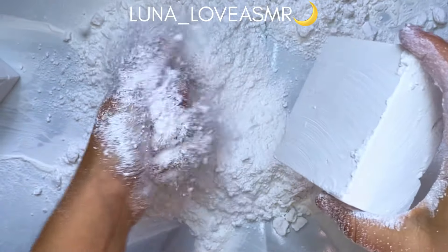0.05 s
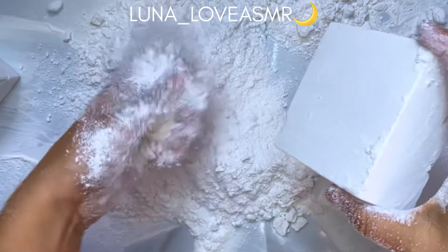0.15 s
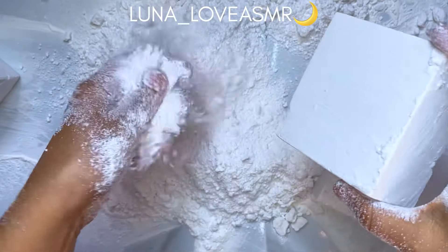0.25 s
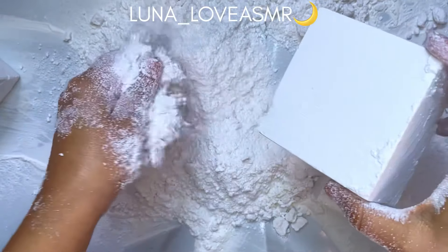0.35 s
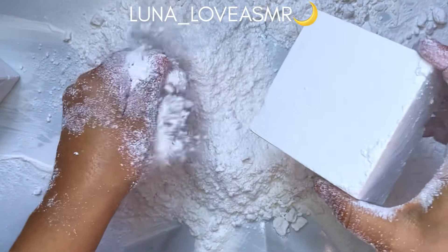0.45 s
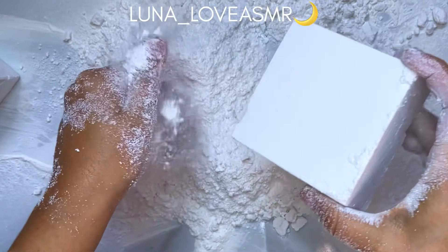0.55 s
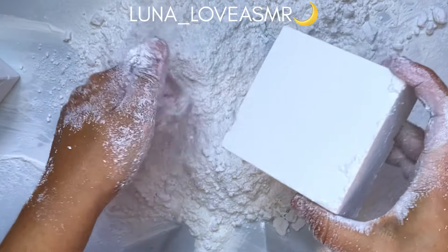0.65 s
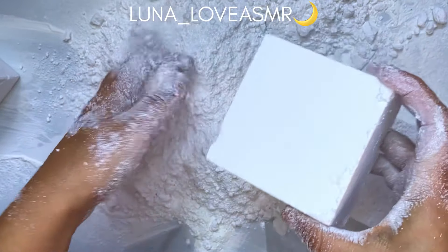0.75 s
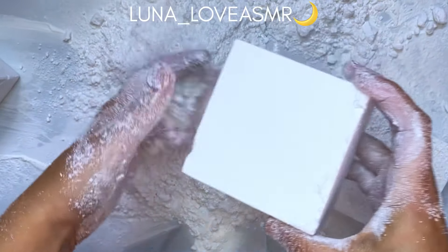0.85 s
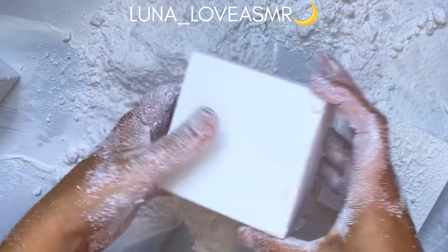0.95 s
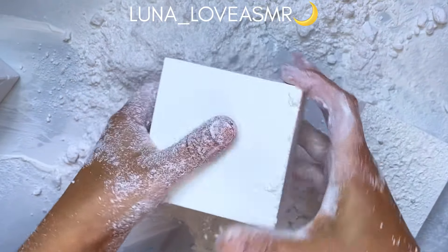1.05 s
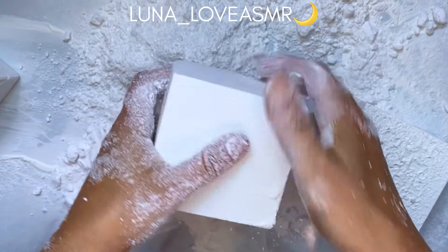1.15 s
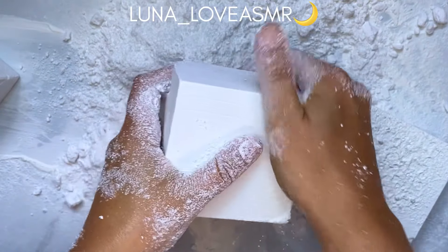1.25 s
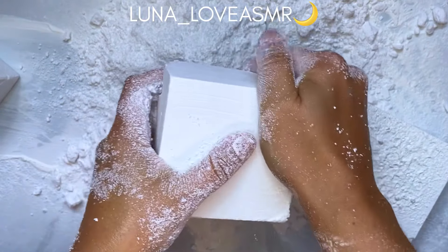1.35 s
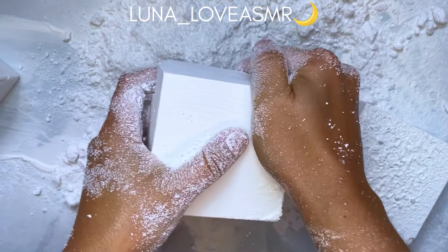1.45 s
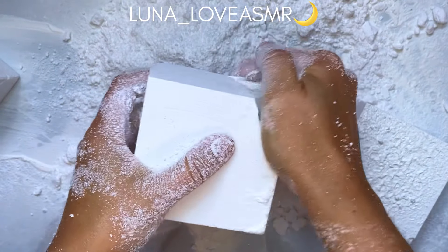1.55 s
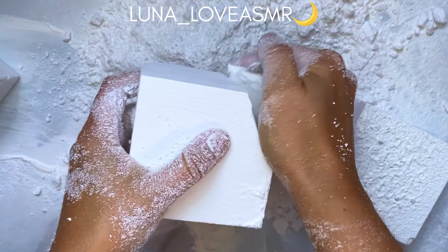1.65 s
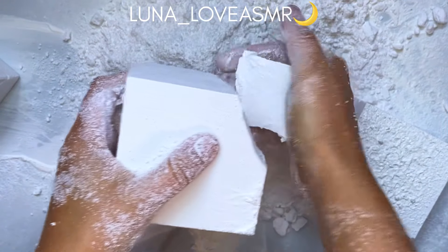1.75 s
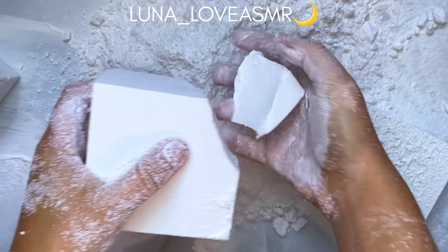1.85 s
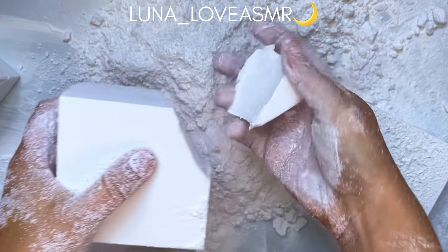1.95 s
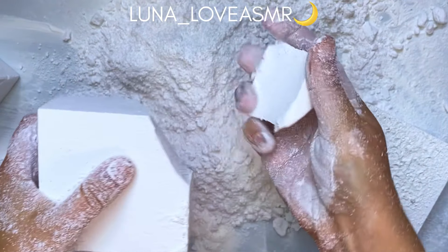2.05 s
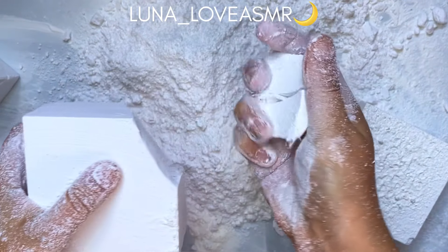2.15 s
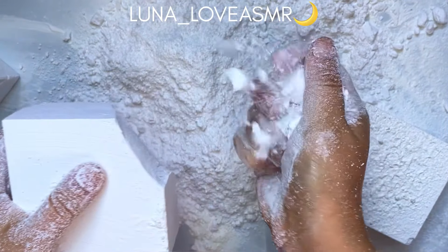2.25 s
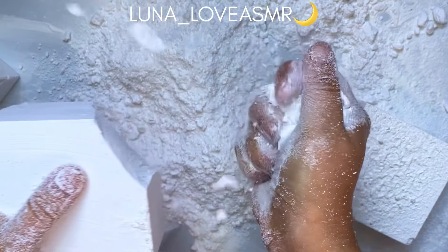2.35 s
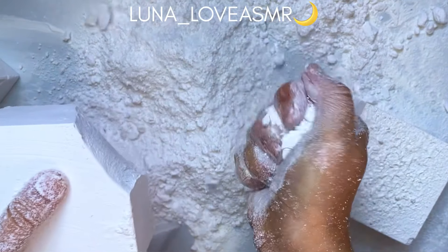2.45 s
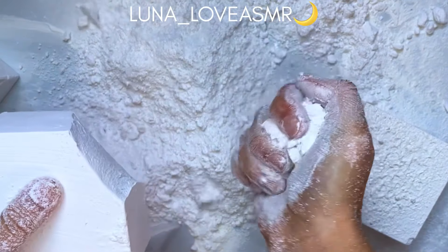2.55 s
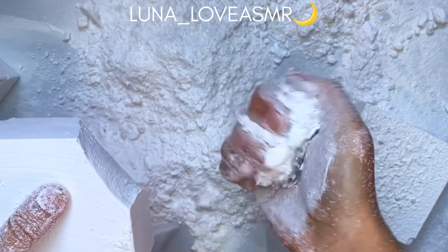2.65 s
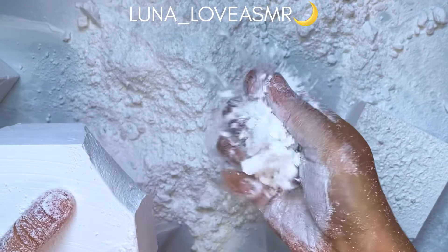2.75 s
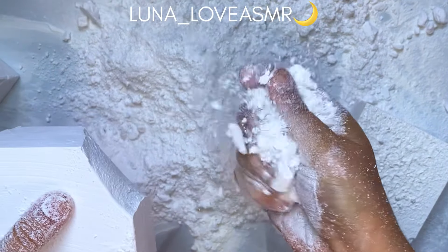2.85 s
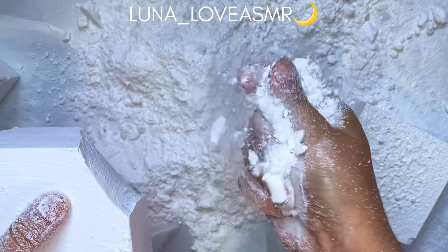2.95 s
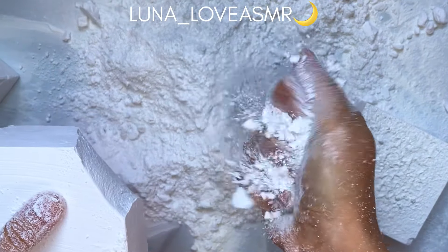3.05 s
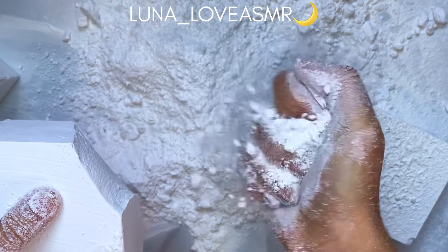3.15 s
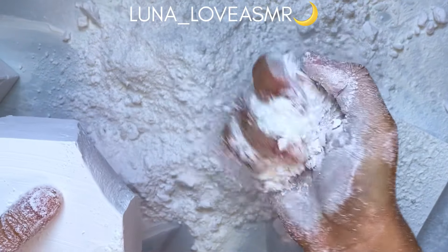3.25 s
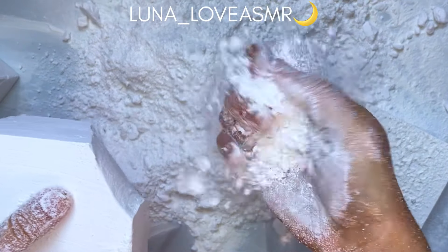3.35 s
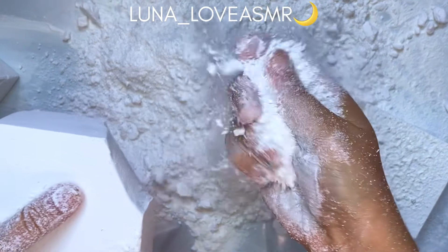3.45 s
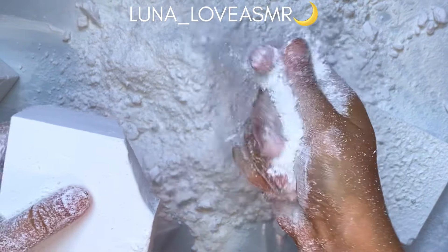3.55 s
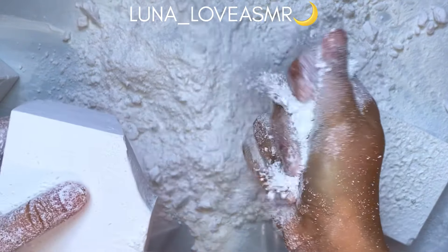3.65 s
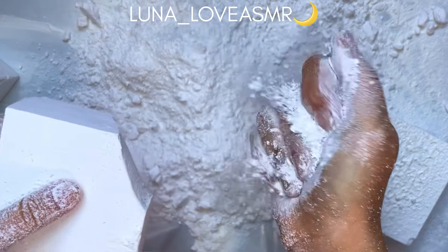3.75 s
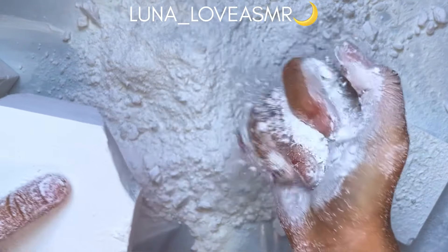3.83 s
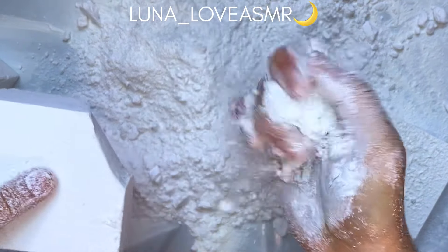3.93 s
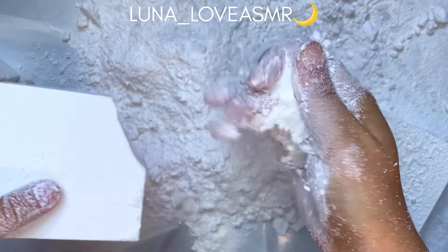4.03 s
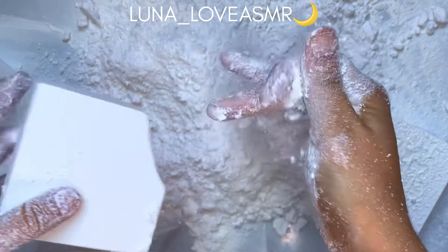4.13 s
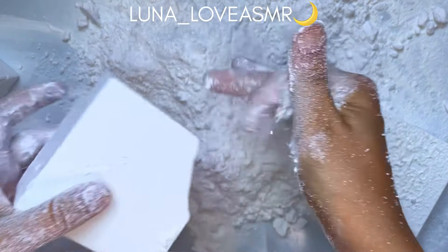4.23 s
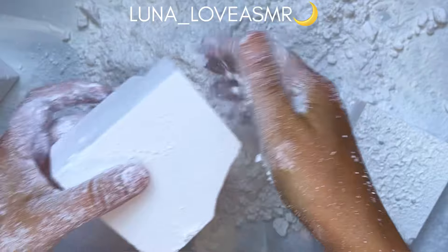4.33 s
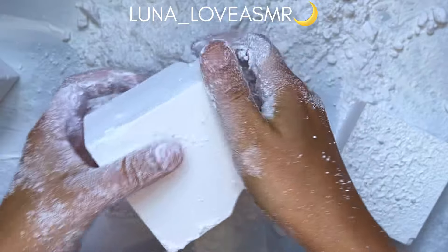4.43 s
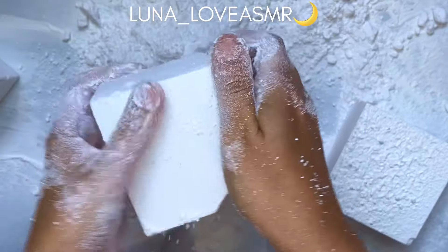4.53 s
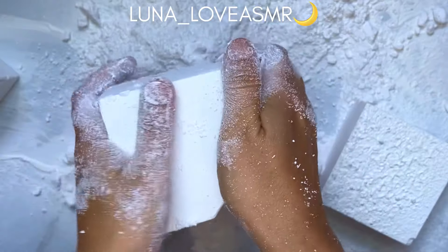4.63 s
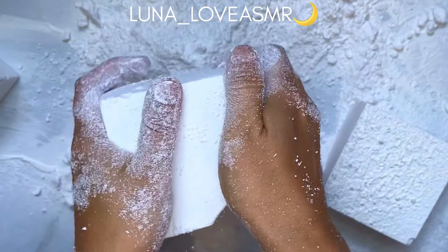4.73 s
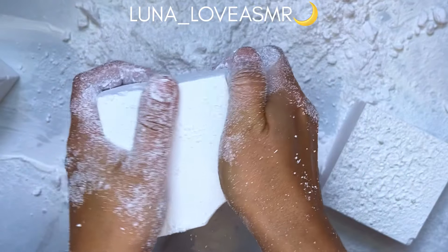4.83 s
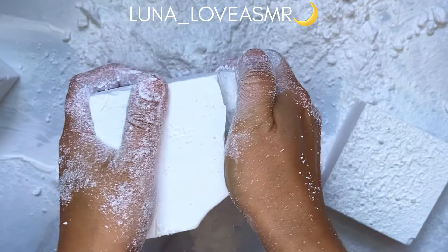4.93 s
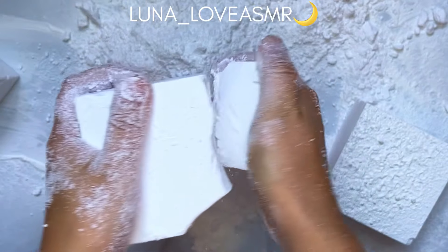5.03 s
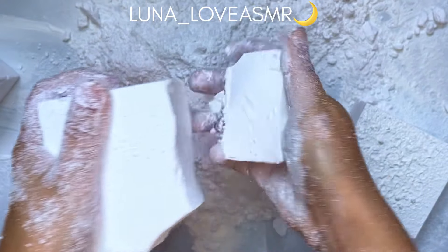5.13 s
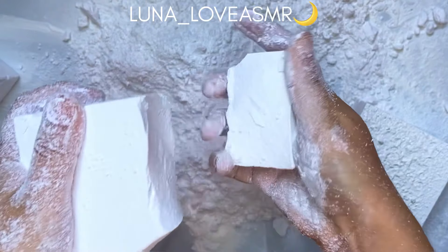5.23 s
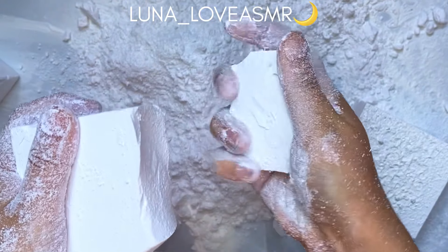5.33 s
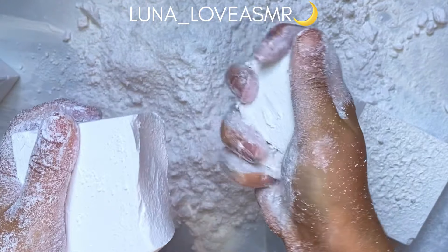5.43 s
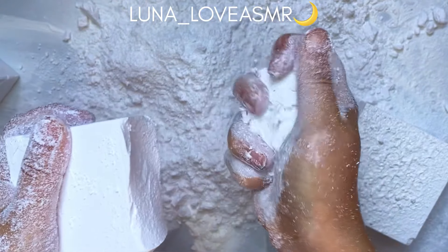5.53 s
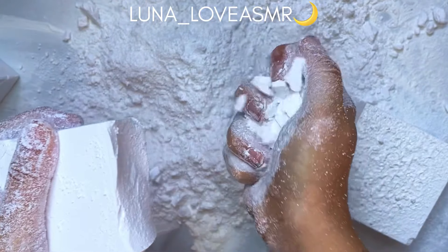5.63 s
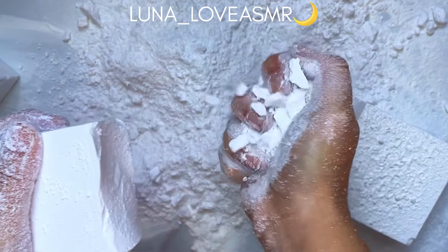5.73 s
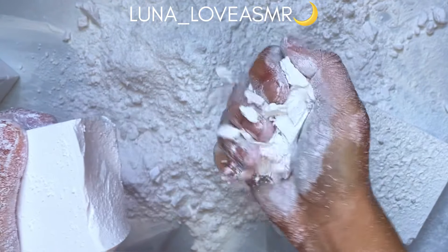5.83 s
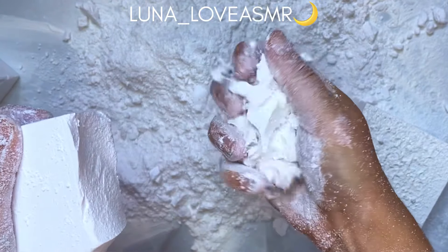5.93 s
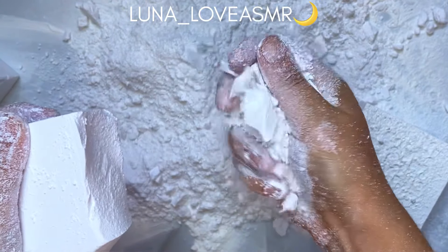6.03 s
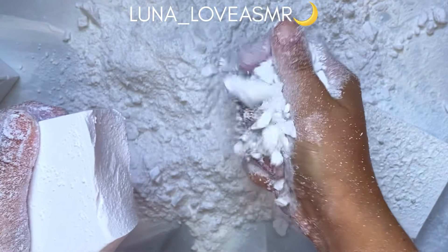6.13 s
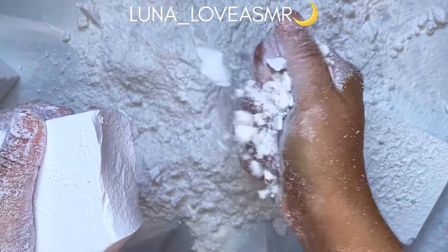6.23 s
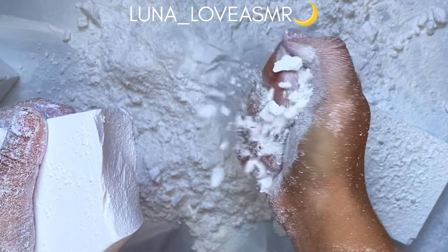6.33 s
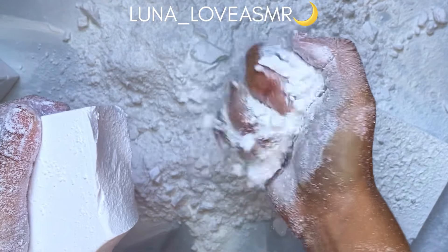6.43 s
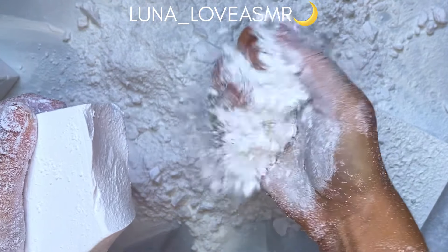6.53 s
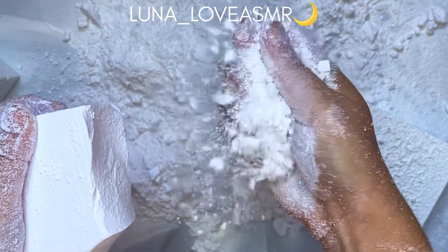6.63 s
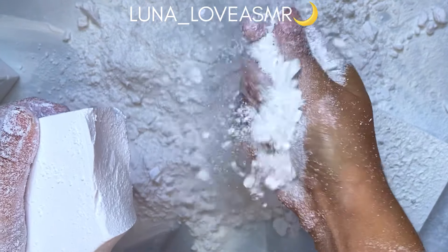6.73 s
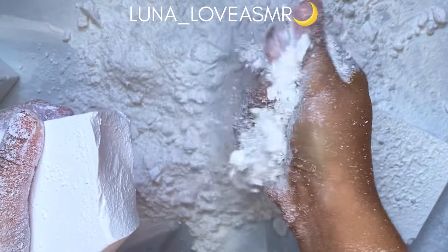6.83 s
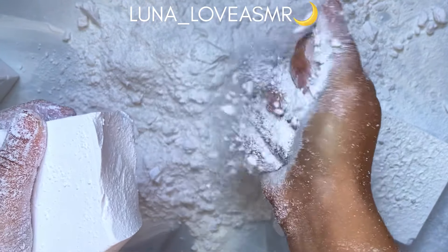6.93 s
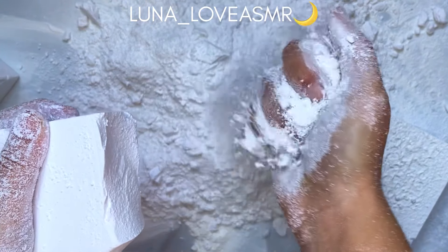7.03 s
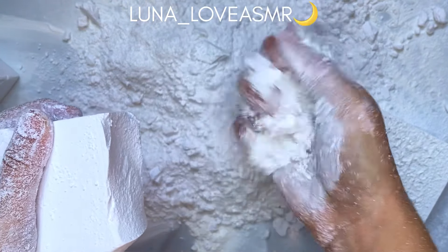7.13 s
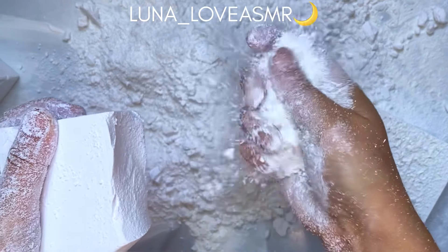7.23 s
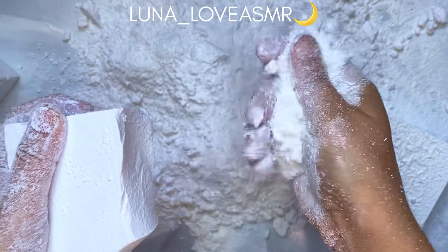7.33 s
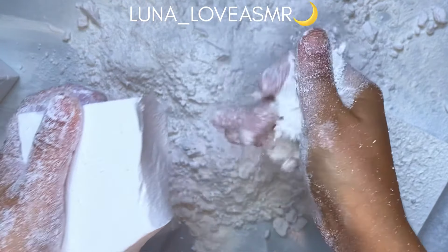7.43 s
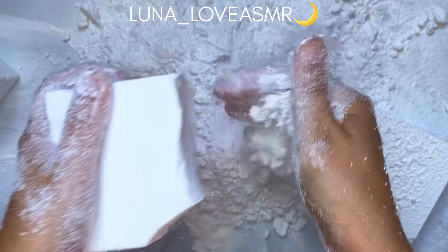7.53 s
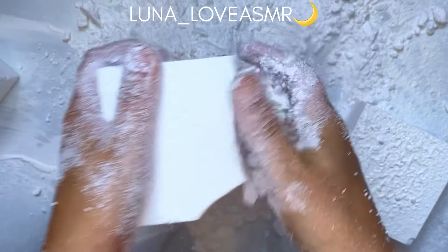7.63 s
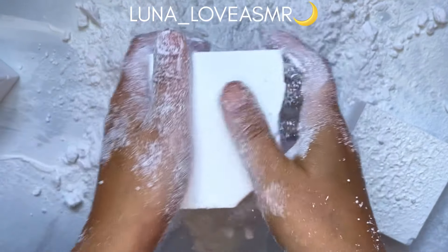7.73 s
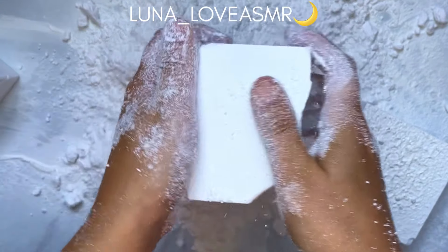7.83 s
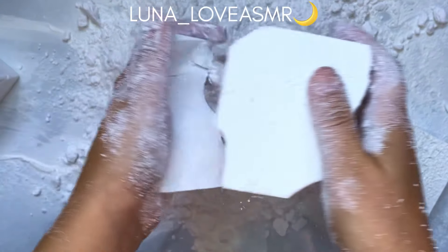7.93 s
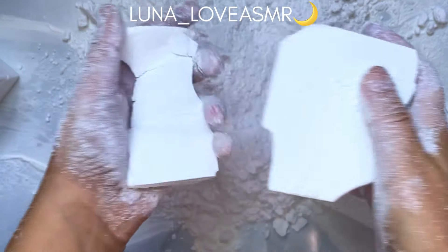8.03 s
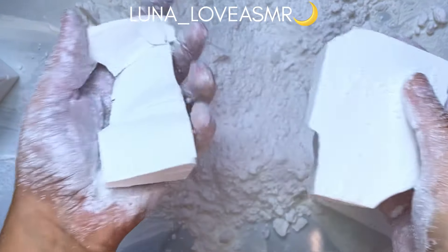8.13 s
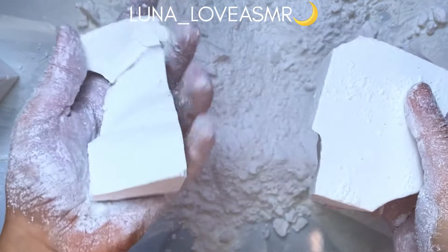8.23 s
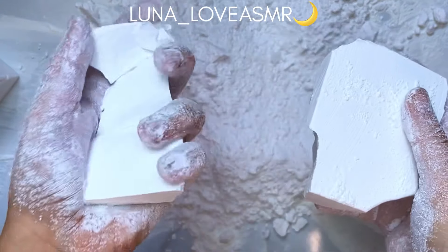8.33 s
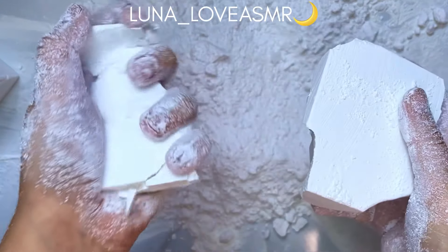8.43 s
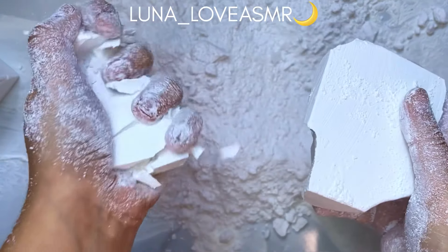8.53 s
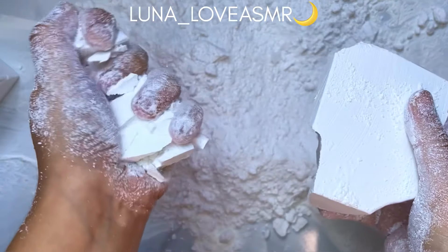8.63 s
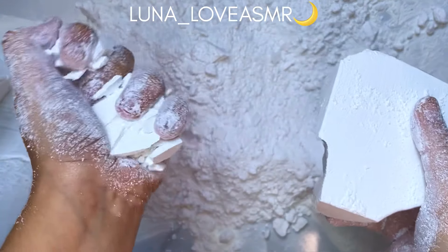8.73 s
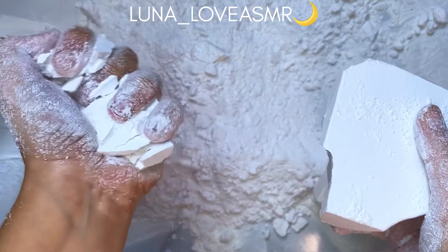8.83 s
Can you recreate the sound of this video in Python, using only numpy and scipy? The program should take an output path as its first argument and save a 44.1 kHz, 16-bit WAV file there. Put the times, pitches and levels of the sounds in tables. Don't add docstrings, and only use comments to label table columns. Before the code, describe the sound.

Quiet, dry room with a faint wavering low hum; stereo microphone very close. From 0 to 0.8 s a hand softly kneads loose chalk powder, gritty and hissing, then a dusty rub and small bump near 1 s. At 1.5 s a bright skin swish and loud brittle snap with a low thud. Around 2.15-2.3 s the piece bursts in the fist with very loud, sharp cracks; crunches and grinding lumps follow, a strong one at 2.87, thinning to soft powder squeezes by 4.2 s. Another break snaps at 4.7-4.85 s. At 5.35-5.5 s a second loud cluster cracks, then crisp chips, ticking grains and pulsing crumbly crunches until 7.5 s. A brief skin swish and soft thud at 7.75-7.9 s. Final crushing starts at 8.35 s, with its loudest crack at 8.46, further snaps at 8.64 and 8.77, and crumbling debris to the end.

```python
import sys
import numpy as np
from scipy import signal
from scipy.fft import rfft, irfft
from scipy.io import wavfile
from scipy.ndimage import uniform_filter1d

SR = 44100
rng = np.random.default_rng(int(sys.argv[2]) if len(sys.argv) > 2 else 0)


def invert_db(level):
    return 10 ** (np.asarray(level, dtype=float) / 20)


def inscribe(sig):
    pcm = np.round(np.clip(np.atleast_2d(sig).T, -1, 1) * 32767)
    wavfile.write(sys.argv[1], SR, pcm.astype(np.int16))


N = 391608


def unit(x):
    return x / np.sqrt(np.mean(x ** 2))


def peak(x):
    return x / np.abs(x).max()


def on_bins(table, size):
    hz, db = np.transpose(table)
    bin_hz = np.arange(size // 2 + 1) * SR / size
    return np.interp(np.log(bin_hz + 1), np.log(hz), db)


def coloured(table, size=N):
    spectrum = rfft(rng.standard_normal(size)) * invert_db(on_bins(table, size))
    return unit(irfft(spectrum, size))


def fade(x, tau_s):
    return signal.lfilter([1], [1, -np.exp(-1 / (tau_s * SR))], x)


def grains(per_s, spread_db, tau_s):
    happens = rng.random(N) < per_s / SR
    size = invert_db(2 * spread_db * rng.exponential(size=N).clip(max=2))
    power = fade(happens * size, tau_s)
    return power / power.mean()


def walk(rate):
    k = int(SR / rate)
    levels = np.repeat(rng.standard_normal(N // k + 1), k)
    return 1.24 * uniform_filter1d(levels, k)[:N]


def swells(rows):
    power = np.zeros(N)
    for s, db, rise_s, fall_s in rows:
        first = max(int((s - 2 * rise_s) * SR), 0)
        last = min(int((s + 2 * fall_s) * SR), N)
        i = np.arange(first, last)
        late = i / SR - s
        power[i] += invert_db(2 * db - 40 * np.maximum(-late / rise_s, late / fall_s))
    return power


def ring(t, hz, rise_s, tau_s, sag):
    phase = 2 * np.pi * hz * (t + sag * tau_s * (1 - np.exp(-t / tau_s)) - sag * t / 2)
    envelope = (1 - np.exp(-t / rise_s)) ** 2 * np.exp(-t / tau_s)
    return peak(envelope * np.sin(phase))


def add(out, x, s):
    i = int(s * SR)
    out[i:i + len(x)] += x[:N - i]


# f/Hz, level/dB
ROOM_COLOUR = [(20, -31), (40, -6), (70, 13), (110, 3), (300, -6), (660, -7.5), (1700, -24), (4000, -52.5),
               (16000, -69)]
ROOM_DB, HUM_DB, HUM_HZ = -59.5, -48, 51.0


def room():
    t = np.arange(N) / SR
    hum = invert_db(HUM_DB + 1.5 * walk(5.8)) * np.sqrt(2) * np.sin(2 * np.pi * HUM_HZ * t)
    common, apart = coloured(ROOM_COLOUR), coloured(ROOM_COLOUR)
    apart = signal.sosfilt(signal.butter(2, 450, "high", fs=SR, output="sos"), apart)
    return hum + invert_db(ROOM_DB) * common, invert_db(ROOM_DB + 4.5) * apart


CLOSE_S, OPEN_S = .11, .12


def kneaded(rest_db, knead_s, knead_db):
    rows = [(s, db, CLOSE_S, OPEN_S) for s, db in zip(knead_s, knead_db)]
    return np.sqrt(invert_db(2 * rest_db) + swells(rows))


# f/Hz, level/dB
LUMP_COLOUR = [(250, -25), (500, -13), (900, -3), (1600, -0.5), (2200, -5), (3000, -3), (5000, -10.5),
               (9000, -29.5), (16000, -32.5)]
# f/Hz, level/dB
POWDER_COLOUR = [(700, -29), (1500, -13), (2500, -1.5), (3500, -7), (5000, 4), (7500, 1), (9000, -3.5),
                 (12000, -3), (16000, -9.5)]
# f/Hz, level/dB
RUMBLE_COLOUR = [(40, -16.5), (90, 6.5), (160, -8), (280, 0), (400, -2.5), (550, -12), (1000, -21.5)]
# t/s, crumbs in the palm level/dB, hand motion level/dB
HANDS_HOLD = [(0, -66, -62), (.5, -66, -59), (.8, -73, -63), (1.35, -78, -59), (1.9, -77, -68),
              (2.15, -62, -69), (2.6, -55, -70), (3.3, -61, -64), (3.62, -56, -57), (4.45, -71, -52),
              (4.88, -68, -53), (5.05, -75, -71), (5.75, -59, -70), (6.6, -52, -52), (7.3, -64, -58),
              (8.05, -76, -61), (8.4, -56, -64), (8.88, -64, -55)]
# t/s, force level/dB, fineness/dB, shove of the hand/dB
FINGER_KNEADS = [(0.0, -49.5, -5.5, -14), (.15, -52, -8, -12), (.28, -57, -9, 0), (.55, -54, -2, 0),
                 (.68, -62, -6, 0), (1.4, -59, -7, -4), (1.62, -56, -4, 10), (2.08, -65, 16, -12),
                 (2.3, -46, 1.5, -4), (2.47, -45, -9, 1.5), (2.71, -49, -11, -16), (2.88, -44, -6.5, -25),
                 (3.07, -48, -10, 6), (3.22, -49.5, -5.5, -12), (3.46, -55, -4, 1.5),
                 (3.86, -50, -4.5, -12), (4.03, -52.5, -2.5, -4), (4.17, -50, -7, 0), (4.76, -62, 7, 12),
                 (4.97, -53, -11, -14), (5.58, -48, 3.5, 5), (6.01, -41.5, -4.5, -10),
                 (6.13, -47, -8.5, -3), (6.45, -45.5, -8, -8), (7.04, -50, -8, -11),
                 (7.25, -49.5, -11, -12), (7.44, -54.5, -6, -4), (7.56, -58.5, -7, 9), (7.78, -55, -4, 7),
                 (8.53, -46, -3, -6)]
DUST_DB, DUST_SLOPE = -61, .9
POWDER_GAIN_DB = 5.5


def crumble():
    hands_s, *columns = np.transpose(HANDS_HOLD)
    crumbs_db, motion_db = (np.interp(np.arange(N) / SR, hands_s, c) for c in columns)
    knead_s, force_db, fine_db, shove_db = np.transpose(FINGER_KNEADS)
    dust_db = DUST_DB + DUST_SLOPE * (crumbs_db + 60)
    grind = kneaded(crumbs_db, knead_s, force_db)
    shove = kneaded(motion_db, knead_s, force_db + shove_db)
    flow = kneaded(dust_db, knead_s, force_db + fine_db)

    coarse = grains(120, spread_db=6, tau_s=.002)
    fine = grains(200, spread_db=6, tau_s=.0006)
    flutter_db = 1.4 * walk(35)
    lump_breaks = np.sqrt(.4 + .5 * coarse + .08 * fine)
    powder_breaks = np.sqrt(.45 + .14 * coarse + .26 * fine)
    lumps = coloured(LUMP_COLOUR) * lump_breaks * grind * invert_db(.68 + flutter_db)
    powder = coloured(POWDER_COLOUR) * powder_breaks * flow * invert_db(flutter_db + POWDER_GAIN_DB)
    rumble = coloured(RUMBLE_COLOUR) * shove * invert_db(2 * walk(25))
    return lumps + powder + rumble


# fastest at t/s, level/dB, swell/s, sink/s (each per 20 dB)
SKIN_RUBS = [(.39, -55, .12, .02), (.985, -46, .012, .06), (1.08, -48, .11, .25), (1.22, -48, .25, .12),
             (1.512, -34, .005, .12), (1.545, -32, .06, .06), (1.66, -59, .1, .2), (4.425, -53, .012, .22),
             (4.55, -51, .12, .06), (5.13, -52.5, .018, .05), (5.203, -50, .007, .06),
             (5.25, -39.5, .03, .03), (7.75, -52, .1, .035), (7.84, -46, .05, .15), (7.89, -34, .04, .03),
             (7.93, -57, .03, .08)]
# f/Hz, level/dB
RUB_COLOUR = [(2300, -23.5), (2900, -2), (3900, -10.5), (4900, 0.5), (5700, -2), (7400, 0.5), (9500, -3.5),
              (13500, -3.5), (16000, -4)]


def rubs():
    return coloured(RUB_COLOUR) * np.sqrt(swells(SKIN_RUBS)) * invert_db(3.5 + 2 * walk(60))


def patchy(x, spread_db):
    _, _, spec = signal.stft(x, SR, nperseg=512)
    field = uniform_filter1d(rng.standard_normal(spec.shape), size=8, axis=0)
    field = uniform_filter1d(field, size=6, axis=1)
    return signal.istft(spec * invert_db(spread_db * unit(field)), SR, nperseg=512)[1][:N]


# t/s, peak level/dB, ring f/Hz, debris tail level/dB
FIST_CRUNCHES = [(2.07, -37, 4460, -17.5), (2.496, -32, 3230, -37), (2.546, -34, 3400, -14.5),
                 (2.822, -38, 1290, -22.5), (2.869, -20.5, 3400, -20), (3.049, -27, 1040, -9.5),
                 (3.137, -32.5, 1610, -23.5), (3.195, -30, 1740, -10.5), (3.209, -29, 1670, -13),
                 (3.37, -32.5, 1940, -13), (3.412, -37, 1480, -10), (3.456, -25, 1070, -29),
                 (3.61, -33, 3470, -33), (4.032, -30.5, 1900, -31), (4.146, -29, 1570, -15),
                 (4.76, -31, 1990, -25), (4.958, -32, 2140, -18), (5.501, -29.5, 1700, -28.5),
                 (5.588, -33.5, 2060, -24), (5.834, -27, 1550, -17.5), (6.319, -30.5, 690, -45),
                 (6.713, -27.5, 1800, -22), (7.221, -30.5, 1680, -18), (7.531, -42.5, 1690, -30.5),
                 (7.542, -28.5, 1530, -13.5), (8.544, -21.5, 1540, -23), (.984, -38, 1500, -15),
                 (3.756, -35, 1050, -20), (6.62, -33, 700, -20), (8.504, -27, 1000, -15)]
# t/s, peak level/dB, ring f/Hz, bright snap level/dB, debris tail level/dB
PIECE_BREAKS = [(1.504, -7.5, 1450, -16.5, -15.5), (2.151, -4.5, 2290, -19.5, -32.5),
                (2.152, -3.5, 1096, -32.5, -28.5), (2.19, -7, 3670, -18.5, -30),
                (2.21, 4, 2200, -18, -21.5), (2.276, -8, 1570, -27.5, -26), (2.425, -22, 2800, -20, -20.5),
                (2.459, -23.5, 770, -12, -22), (2.691, -21.5, 3520, -32.5, -15),
                (4.704, -20, 2010, -9, -14), (4.825, -21.5, 1600, -0.5, -4.5),
                (4.861, -18.5, 1690, -42, -30), (5.342, -22.5, 3423, -8, -25),
                (5.367, -10.5, 3650, -20, -29), (5.417, 2.5, 1530, -30, -25.5),
                (5.434, -2, 1800, -22.5, -42), (5.479, -24.5, 4560, -8, -28), (5.516, -10, 1750, -9, -14),
                (8.359, -22, 1910, -14, -8), (8.403, -16.5, 4350, -29.5, -14), (8.451, -14, 2020, -21, -22),
                (8.464, 2.5, 3180, -20, -29.5), (8.644, -6.5, 1850, -11.5, -31.5),
                (8.774, -15.5, 4270, -23, -26)]
# t/s, peak level/dB, ring f/Hz, debris tail level/dB
OPEN_CHIPS = [(2.393, -36, 895, -38), (2.406, -29, 3660, -26), (5.198, -42, 4500, -25),
              (5.612, -29, 4050, -33), (5.689, -33, 4200, -10), (5.719, -38, 3600, -16),
              (5.768, -35, 2930, -9), (5.979, -37, 1500, -8), (6.078, -30, 1300, -19),
              (6.14, -27, 1450, -20.5), (6.249, -32, 1510, -12), (6.544, -35, 1410, -9),
              (6.801, -32, 1640, -16), (7.03, -38, 1720, -6), (7.883, -31, 2680, -23),
              (8.271, -43, 1760, -20), (8.316, -42, 1770, -20), (8.353, -35, 1880, -31),
              (8.583, -24, 2040, -46), (8.62, -32, 1920, -8), (8.835, -31, 4300, -37)]
MUFFLED_SNAP_DB, CRISP_SNAP_DB = -24, -8


def cracks():
    out, t = np.zeros(N), np.arange(4096) / SR
    bright, broad = coloured(POWDER_COLOUR), coloured(LUMP_COLOUR)
    debris = grains(300, spread_db=10, tau_s=.001)
    edge = (1 - np.exp(-t / .0004)) * np.exp(-t / .0009)
    tumble = (1 - np.exp(-t / .005)) * np.exp(-t / .03)
    knock = invert_db(-26.5) * ring(t, 400, .00094, .003, .4)
    crunches = [(s, db, hz, MUFFLED_SNAP_DB, tail_db) for s, db, hz, tail_db in FIST_CRUNCHES]
    chips = [(s, db, hz, CRISP_SNAP_DB, tail_db) for s, db, hz, tail_db in OPEN_CHIPS]
    for s, db, hz, snap_db, tail_db in [*PIECE_BREAKS, *crunches, *chips]:
        i = min(int(s * SR), N - len(t))
        near = slice(i, i + len(t))
        chirp = .58 * ring(t, hz, .0002, .0011, .99)
        burst = .62 * peak(edge * broad[near])
        snap = invert_db(snap_db + 16) * peak(edge * bright[near])
        tail = tumble * np.sqrt(.5 + debris[near] / 2) * (.53 * broad[near] + .64 * bright[near])
        crack = chirp + burst + snap + knock + invert_db(tail_db) * tail
        add(out, invert_db(db) * crack, s + .0008)
    return out


# t/s, peak level/dB, f/Hz, time to fall
# 60 dB/s
BLOCK_THUDS = [(.985, -38.5, 300, 0.022), (1.008, -27.5, 85, .04), (1.506, -20.5, 140, 0.046),
               (2.28, -41.5, 170, 0.059), (2.455, -32, 340, 0.065), (2.46, -39.5, 120, .06),
               (4.148, -47, 110, .05), (4.701, -34, 123, .07), (4.826, -29, 130, 0.091),
               (5.418, -15, 720, 0.011), (2.153, -18.5, 780, 0.011), (7.752, -34.5, 496, 0.022),
               (1.506, -11.5, 360, 0.02), (5.437, -19.5, 370, 0.023), (4.826, -21, 290, 0.015),
               (4.706, -28.5, 320, 0.016), (7.757, -30, 95, 0.043), (8.647, -36.5, 180, 0.036),
               (2.154, -27, 230, .04), (2.212, -30, 180, .05), (5.42, -30, 170, .05),
               (8.466, -36, 150, .05)]


def thuds():
    out, t = np.zeros(N), np.arange(8192) / SR
    for s, db, hz, t60 in BLOCK_THUDS:
        add(out, invert_db(db) * ring(t, hz, .0018, t60 / np.log(1000), .59), s)
    return out


# t/s, peak level/dB
COARSE_GRAINS = [(2.16, -8.5), (2.242, -17), (2.251, -9), (2.478, -21), (3.061, -36), (3.808, -41),
                 (4.006, -31.5), (4.124, -39), (4.772, -28), (5.422, -20), (5.565, -17), (5.6, -22.5),
                 (5.65, -29.5), (5.903, -35.5), (5.986, -30), (6.005, -29), (6.054, -29), (6.196, -28.5),
                 (6.274, -27.5), (6.671, -21), (6.869, -31), (7.06, -28.5), (7.431, -36), (8.118, -42),
                 (8.473, -23), (8.55, -20.5), (8.768, -28)]
# t/s, peak level/dB
FINE_GRAINS = [(1.375, -42), (1.841, -43.5), (2.091, -28), (2.121, -27), (2.233, -23), (2.331, -28.5),
               (2.357, -30), (2.556, -29), (2.562, -25.5), (2.922, -33), (3.453, -27.5), (3.897, -34),
               (4.103, -39), (4.767, -26), (5.288, -33), (5.553, -16.5), (5.775, -21.5), (6.18, -34),
               (6.216, -32), (6.614, -25), (6.877, -28.5), (6.955, -33), (7.33, -35.5), (7.352, -35),
               (8.385, -21), (8.411, -21), (8.443, -13.5), (8.522, -21), (8.628, -23)]
COARSE_HZ, FINE_HZ = 3600, 6800


def ticks():
    out, t = np.zeros(N), np.arange(512) / SR
    snaps = [(s, db, COARSE_HZ) for s, db in COARSE_GRAINS]
    snaps += [(s, db, FINE_HZ) for s, db in FINE_GRAINS]
    for s, db, hz in snaps:
        burst = rng.standard_normal(len(t)) * np.exp(-t / .00089)
        edges = np.clip([.65 * hz, 1.5 * hz], 300, 16000)
        tick = signal.sosfilt(signal.butter(1, edges, "band", fs=SR, output="sos"), burst)
        add(out, invert_db(db) * peak(tick), s)
    return out


def reflections(x):
    t = np.arange(4096) / SR
    echo = rng.standard_normal((2, len(t))) * (1 - np.exp(-t / .001)) * np.exp(-t / .017)
    echo = signal.sosfilt(signal.butter(1, 5000, fs=SR, output="sos"), echo)
    return invert_db(-35.5) * signal.fftconvolve(x[None], echo, axes=1)[:, :N]


# f/Hz, phase/rad
RIGHT_LAG = [(0, 0), (500, -.55), (1050, -.33), (1750, 0), (2100, .9), (2650, 2.6), (3100, 1.7),
             (3700, 1.05), (4300, 1.25), (5200, 1.9), (5900, 3.14), (14700, 15.71), (16500, 16.7),
             (22050, 22)]
# f/Hz, level/dB
LEFT_TILT = [(30, 0), (120, -1.5), (300, -3.3), (600, -2), (1100, -.3), (2200, -1), (4500, -1.2), (6000, 0)]


def ports(x):
    hz, lag = np.transpose(RIGHT_LAG)
    turn = np.exp(.5j * np.interp(np.arange(N // 2 + 1) * SR / N, hz, lag))
    tilt = invert_db(on_bins(LEFT_TILT, N) / 2)
    spectrum = rfft(x)
    return np.array([irfft(spectrum * turn * tilt, N), irfft(spectrum / turn / tilt, N)])


def scene():
    common, apart = room()
    chalk = patchy(crumble() + rubs(), spread_db=2.5) + cracks() + thuds() + ticks()
    opposed = apart * np.array([[1], [-1]])
    return ports(chalk + common) + reflections(chalk) + opposed


def low_pass(x):
    return signal.sosfilt(signal.butter(12, 16340, fs=SR, output="sos"), x)


def record(dry):
    x = signal.sosfilt(signal.ellip(8, .2, 60, 15750, fs=SR, output="sos"), dry)
    mix = np.clip(x, -1, 1)
    return low_pass(mix)


dry = scene()
out = record(dry)
inscribe(out)
```